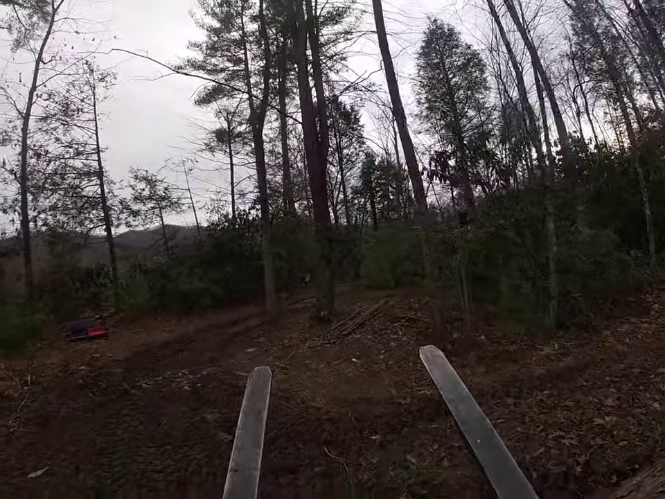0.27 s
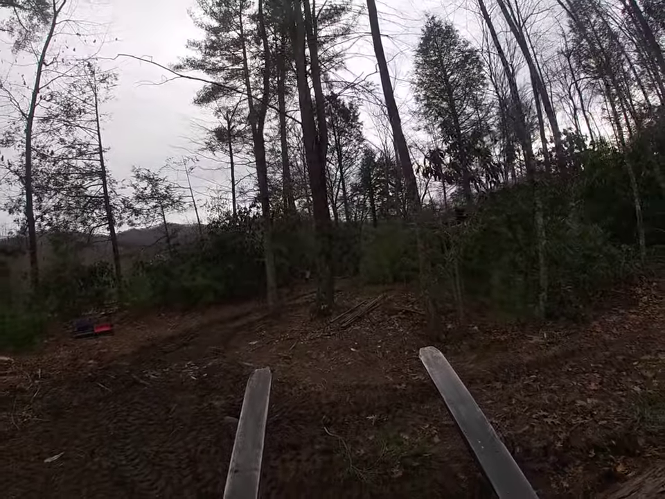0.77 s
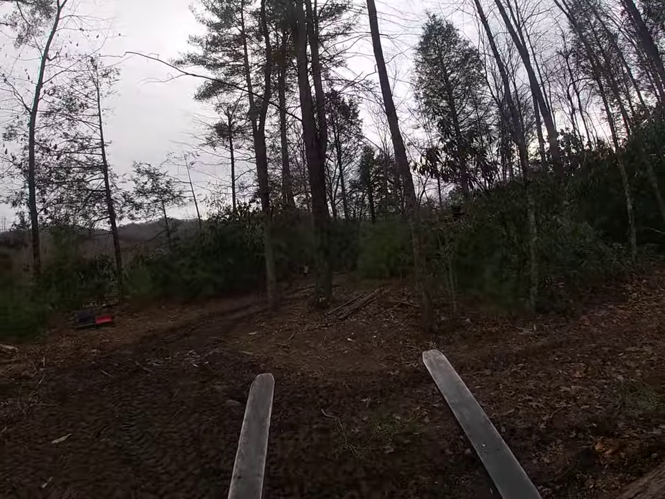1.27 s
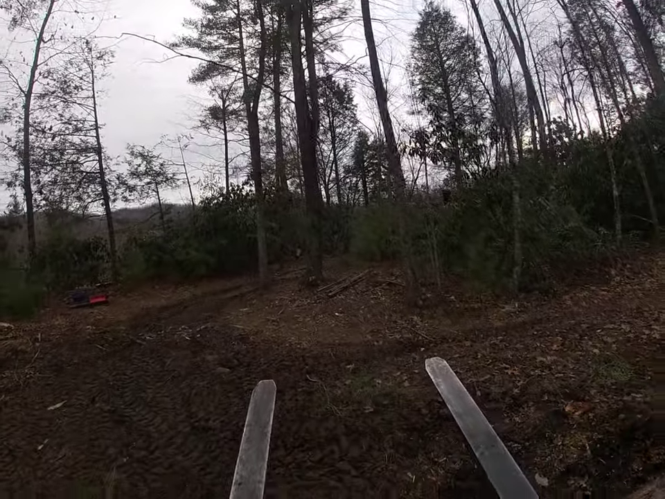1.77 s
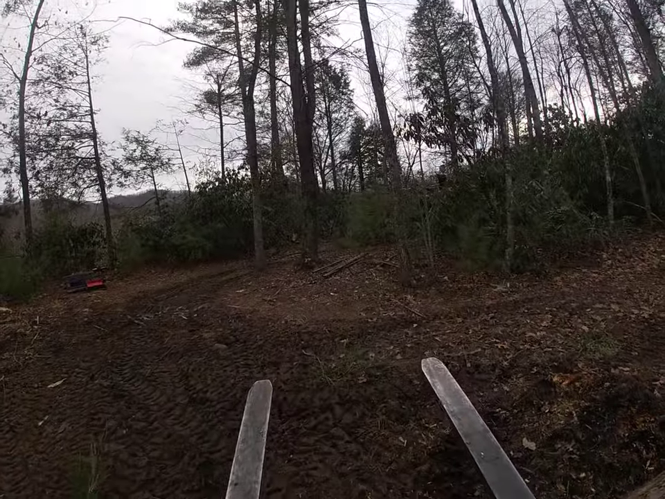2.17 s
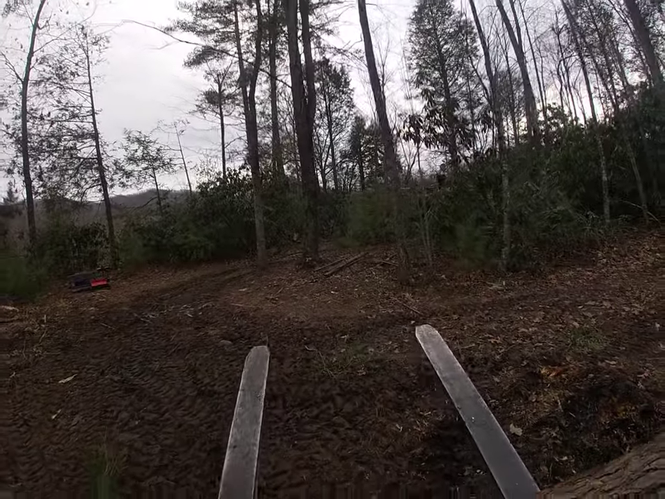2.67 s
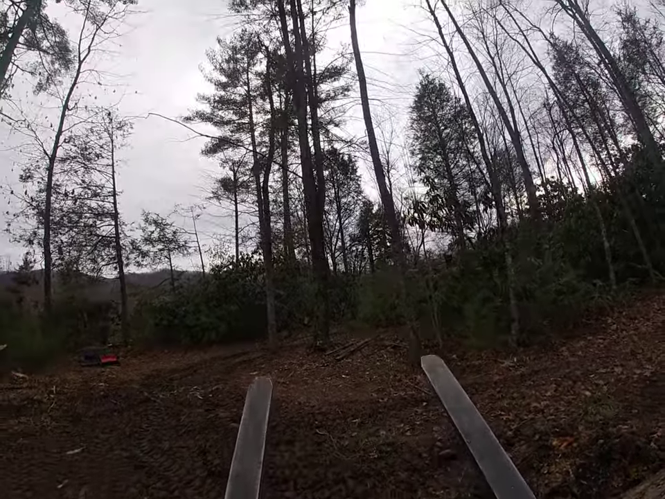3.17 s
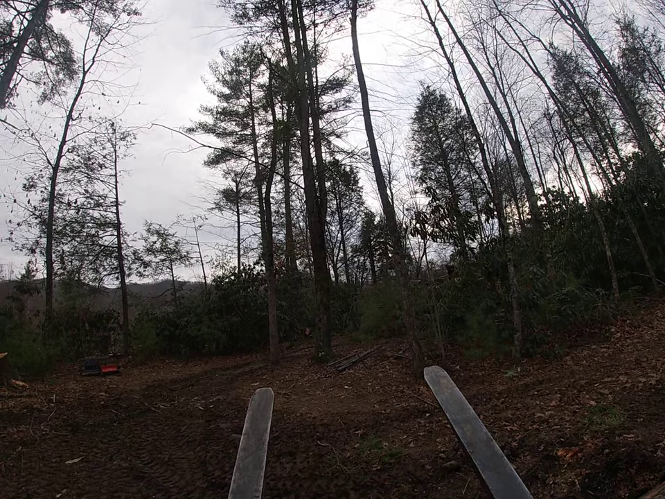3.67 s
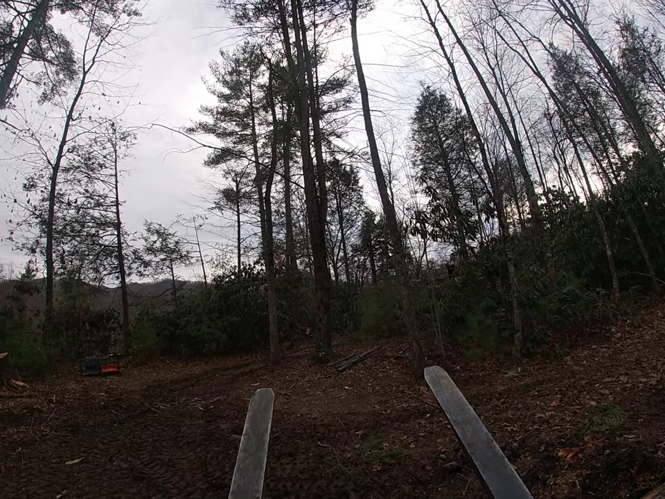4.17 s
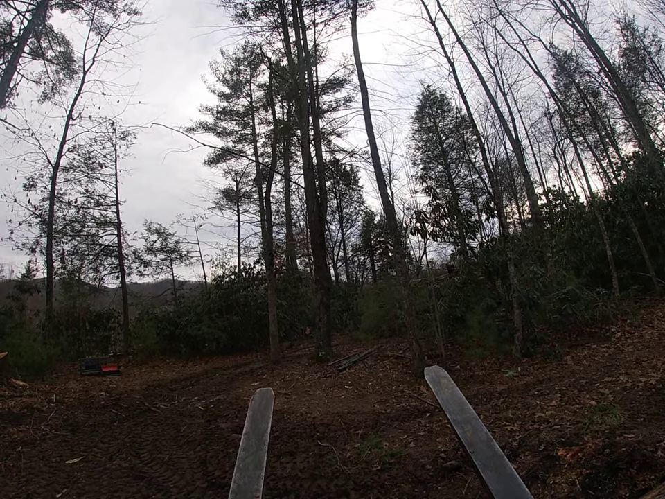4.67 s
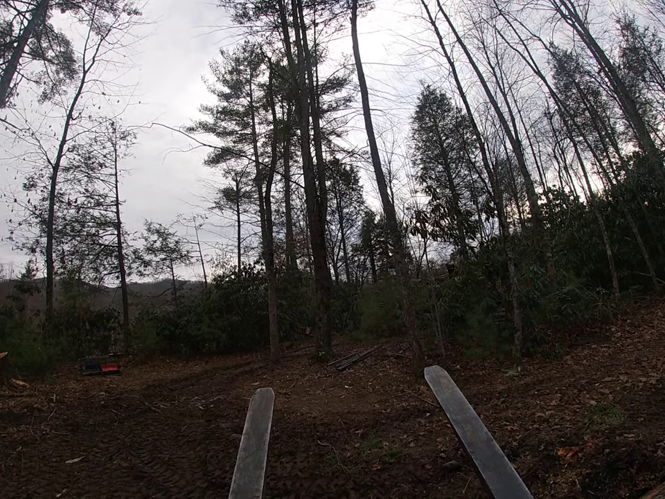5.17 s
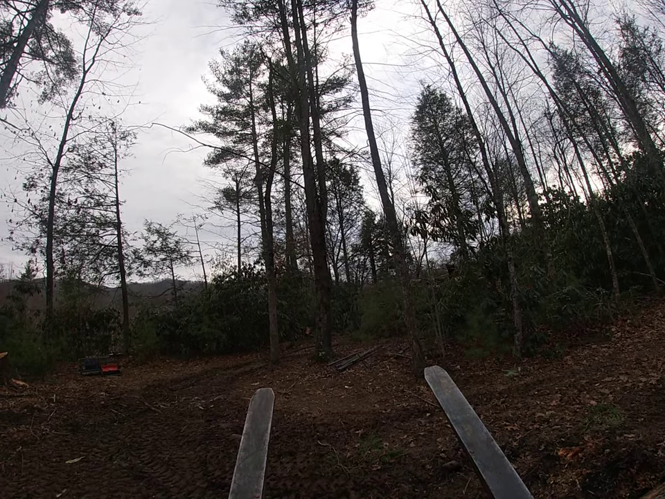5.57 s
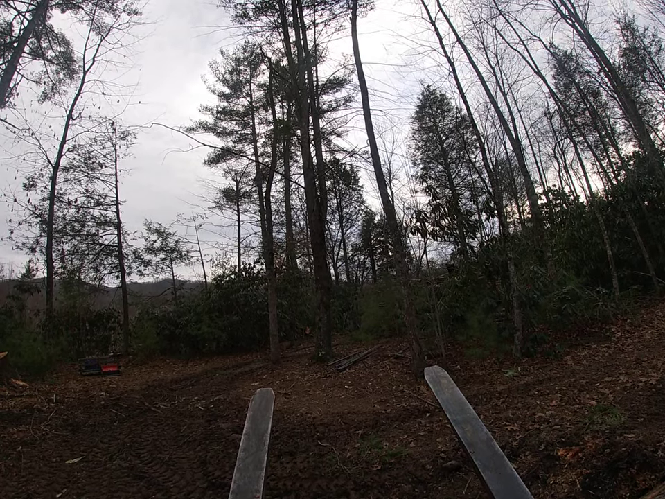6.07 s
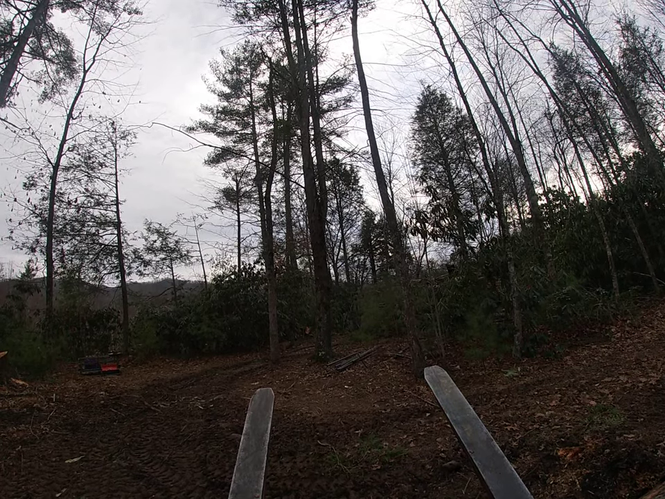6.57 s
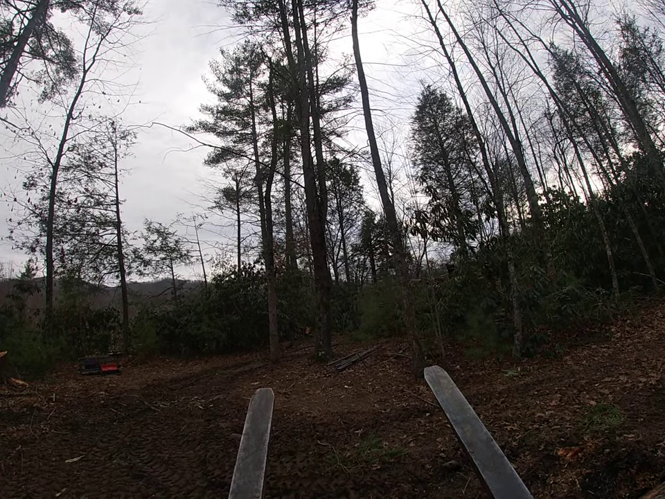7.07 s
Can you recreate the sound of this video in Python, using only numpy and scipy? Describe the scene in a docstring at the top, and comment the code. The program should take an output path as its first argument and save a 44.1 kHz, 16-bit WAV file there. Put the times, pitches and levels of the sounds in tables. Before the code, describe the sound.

A diesel tractor runs close by with its loader hydraulics whining, clunks once, then throttles down to a clattering idle.

```python
"""A three-cylinder diesel tractor, heard from the seat. Its firings pulse the exhaust, shake the
chassis and rattle panels, block and valve gear; fan, pump and gears turn with the crank.
The hydraulics whine while the front loader works. Near 3 s the engine labours, the loader
clunks and its steel clinks. The engine then runs free, is throttled back at 5.5 s, sags and
settles into a clattering idle."""
import sys
import numpy as np
from scipy import signal
from scipy.fft import rfft, irfft, next_fast_len
from scipy.io import wavfile

SR = 44100
rng = np.random.default_rng(int(sys.argv[2]) if len(sys.argv) > 2 else 0)


def unload_audio(sound):
    """Save the sound as a 16-bit wav file, at the path given as the first command line argument."""
    columns = np.transpose(np.atleast_2d(sound))
    # keep every value between -1 and 1, then stretch to whole-number steps
    steps = np.round(np.clip(columns, -1, 1) * 32767)
    wavfile.write(sys.argv[1], SR, steps.astype(np.int16))


N = 323253


def from_db(db):
    """Decibels to gain."""
    return 10 ** (np.asarray(db) / 20)


def unit_rms(x):
    """Scale to rms 1."""
    return x / np.sqrt(np.mean(x ** 2) + 1e-20)


def curve(rows):
    """Interpolate (seconds, value) rows at every sample."""
    return np.interp(np.arange(N) / SR, *np.transpose(rows))


def gesture(start_s, attack_s, hold_s, release_s):
    """Rise from 0 to 1, hold, fall back."""
    corners_s = start_s + np.cumsum([0, attack_s, hold_s, release_s])
    return np.interp(np.arange(N) / SR, corners_s, [0, 1, 1, 0])


def state_db(part_db, state):
    """part_db lists dB running free, then dB added by load, lugging, straining, coasting, idling."""
    return part_db[0] + np.array(part_db[1:]) @ state


def drift(rate_hz):
    """Slow random wander, rms about 1."""
    hop = 100
    pole = np.exp(-2 * np.pi * rate_hz * hop / SR)
    noise = rng.standard_normal(N // hop + 1002)
    slow = signal.lfilter([1], [1, -2 * pole, pole * pole], noise)[1000:]
    return np.interp(np.arange(N) / hop, np.arange(len(slow)), unit_rms(slow))


def tone(turns, flutter_db, wobble_turns):
    """Sine with wavering level and phase, rms 1."""
    gain = from_db(flutter_db * drift(9))
    return unit_rms(gain * np.sin(2 * np.pi * (turns + wobble_turns * drift(7))))


def resonance(hz, centre_hz, width_hz):
    """Gain through a resonance, 1 at its centre."""
    return 1 / np.sqrt(1 + (2 * (hz - centre_hz) / width_hz) ** 2)


def ring(force, hz, t60_s):
    """One mode of a metal part: each tap starts a decaying sine."""
    r, w = from_db(-60 / (t60_s * SR)), 2 * np.pi * hz / SR
    return signal.lfilter([0, np.sin(w)], [1, -2 * r * np.cos(w), r * r], force + 1e-18)


def colour(force, spectrum, modes=()):
    """Pass a force through a body with a broad spectrum and a few resonances; rms 1."""
    size = next_fast_len(N)
    hz = np.arange(size // 2 + 1) * SR / size + 1
    points_hz, points_db = np.transpose(spectrum)
    gain = from_db(np.interp(np.log(hz), np.log(points_hz), points_db))
    gain *= np.minimum(1, hz / points_hz[0]) ** 2 * np.minimum(1, points_hz[-1] / hz) ** 4
    for centre_hz, width_hz, lift_db in modes:
        gain *= 1 + (from_db(lift_db) - 1) * resonance(hz, centre_hz, width_hz) ** 2
    return unit_rms(irfft(rfft(force, size) * gain, size)[:N])


def impacts(firings, repeat, depth, decay, uneven_db, lag):
    """Noisy force swelling once per firing; decay and lag are in firing periods."""
    points = 2800
    cycle = np.interp(firings / 3 % 1 * points, np.arange(points), rng.standard_normal(points))
    # The share `repeat` of the power recurs every three firings.
    force = np.sqrt(repeat) * unit_rms(cycle) + np.sqrt(1 - repeat) * rng.standard_normal(N)
    turns = firings + 1 - lag
    strength = from_db(uneven_db * rng.standard_normal(size=1000))[turns.astype(int)]
    age = turns % 1 / decay
    return force * (1 + depth * strength * age * np.exp(1 - age))


def bursts(rows, spectrum):
    """Short crunches of many tiny contacts, as decaying noise."""
    t, envelope = np.arange(N) / SR, np.zeros(N)
    for start_s, db, decay_s in rows:
        age_s = np.maximum(t - start_s, 0)
        envelope += from_db(db) * (1 - np.exp(-age_s / 0.0022)) * np.exp(-age_s / decay_s)
    return envelope * colour(rng.standard_normal(N), spectrum)


def chatter(modes, taps_per_s):
    """Random taps on loose metal, each striking each mode with its own strength; rms 1."""
    taps = rng.random(N) < taps_per_s / SR
    rings = sum(from_db(db) * ring(taps * rng.uniform(-1.12, 1, N), hz, t60_s)
                for hz, db, t60_s in modes)
    band = signal.butter(2, [1100, 3000], "band", fs=SR, output="sos")
    return unit_rms(signal.sosfilt(band, rings))


# Each row: start in seconds, level in dB, decay in seconds.
TICK_EVENTS = [(.79, -56, .01), (1.362, -48, 0.011), (2.678, -52, 0.0043), (4.443, -52, .014)]
# Each row: frequency in Hz, relative density in dB.
TICK_SPECTRUM = [(3000, -24), (6100, -1), (7500, -7), (10500, -13.5), (14000, -24)]


def ticks():
    """A few faint, bright ticks."""
    return bursts(TICK_EVENTS, TICK_SPECTRUM)


# Each row: frequency in Hz, relative density in dB.
HISS_SPECTRUM = [(5500, -1), (7000, -4), (8000, -7), (9100, -3), (10000, -9.5), (11000, -10.5),
                 (11800, -22), (14500, -20)]


def hiss(firings, idling, valves_db):
    """Injectors and intake hiss, falling back at idle."""
    force = impacts(firings, repeat=.3, depth=.45 + .4 * idling, decay=.15, uneven_db=2, lag=.6)
    return from_db(valves_db - 15 - idling) * colour(force, HISS_SPECTRUM)


# Each row: frequency in Hz, level in dB relative to the valve gear.
RINGING_TONES = [(2607, -9.5), (4070, -20), (6855, -33), (10220, -38)]


def ringing(valves_db):
    """Lightly damped engine parts sing at their own pitches, whatever the speed."""
    t = np.arange(N) / SR
    return sum(from_db(valves_db + db) * tone(hz * t, flutter_db=6, wobble_turns=.21)
               for hz, db in RINGING_TONES)


# Each row: frequency in Hz, relative level in dB, T60 in seconds.
SHEET_MODES = [(1257, -4, .11), (1320, -3.5, .08), (1522, 0, .13), (1542, -2, .1), (2920, -13, .03)]
PIN_MODES = [(1955, -7, .04), (2256, 2, .06), (2280, 0.5, .06), (2360, -7, .06)]
SHEET_DB = (-46, -2.5, -2, 8.5, -7, 10.5)
PIN_DB = (-51, 0.5, 0, -5, -15, 0.5)


def loose_parts(firing_hz, state):
    """A sheet and a pin chatter lightly at speed, harder as the idle rocks the tractor."""
    rocking_db = 13.5 * resonance(firing_hz, centre_hz=23.9, width_hz=2.6)
    sheet = from_db(state_db(SHEET_DB, state)) * chatter(SHEET_MODES, taps_per_s=400)
    pin = from_db(state_db(PIN_DB, state) + rocking_db) * chatter(PIN_MODES, taps_per_s=97)
    return sheet + pin


# Each row: start in seconds, level in dB.
CLINK_EVENTS = [(2.888, -38), (3.110, -27), (3.120, -21), (3.144, -22.5), (3.163, -37), (3.192, -38)]
# Each row: frequency in Hz, relative level in dB, T60 in seconds.
STEEL_MODES = [(3330, -17, 0.081), (3890, -17, 0.06), (4930, -11, .03), (5020, -15, 0.12), (5150, 4, 0.033),
               (8650, -28, 0.061), (8970, -23.5, 0.049), (10500, -41, .06)]


def loader_clinks(contact_s):
    """Loose steel bounces softly; each touch rings every mode with its own strength."""
    out, t = np.zeros(N), np.arange(SR // 2) / SR
    attack = 1 - np.exp(-(t / contact_s) ** 2)
    for start_s, db in CLINK_EVENTS:
        at = int(start_s * SR)
        for hz, mode_db, t60_s in STEEL_MODES:
            strength = from_db(db + mode_db + rng.standard_normal())
            envelope = strength * attack * from_db(-60 * t / t60_s)
            out[at:at + len(t)] += envelope * np.sin(2 * np.pi * (hz * t + rng.random()))
    rubbing = 1 + .45 * drift(120)
    return out * rubbing


# Each row: start in seconds, level in dB, decay in seconds.
CLUNK_EVENTS = [(3.015, -14.5, 0.011), (3.033, -11.5, 0.015), (3.046, -23, 0.051), (3.07, -34, 0.16)]
# Each row: frequency in Hz, relative density in dB.
LOADER_SPECTRUM = [(25, 3), (120, 10.5), (250, 10), (600, 1.5), (1200, -5), (2200, -9), (3500, -15.5),
                   (5500, -19.5), (7000, -31.5), (10000, -54), (13000, -60)]


def loader_clunks():
    """The loader takes a quick run of dull knocks."""
    return bursts(CLUNK_EVENTS, LOADER_SPECTRUM)


# Each row: frequency in Hz, relative density in dB.
OIL_SPECTRUM = [(90, -22), (175, -5), (280, 9.5), (400, 14.5), (520, -34.5), (700, -28), (850, -1.5),
                (1050, -5.5), (1300, -14), (2000, -10.5), (3000, -13.5), (4500, -55), (8000, -44)]
# Each row: multiple of the firing rate, level in dB at full load.
GEAR_OVERTONES = [(24.89, -47), (31.1, -52), (37.33, -52), (90.66, -59)]


def hydraulics(firings, load, lugging):
    """Under load high gear tones sing and oil rushes through the valves, less as the engine lugs."""
    rush = from_db(-29 - 8 * lugging) * colour(rng.standard_normal(N), OIL_SPECTRUM)
    singing = sum(from_db(db) * tone(multiple * firings, flutter_db=2, wobble_turns=.08)
                  for multiple, db in GEAR_OVERTONES)
    return np.sqrt(load) * rush + load ** 2 * singing


PUMP_DB = (-39, 14.5, 2.5, 1.5, 5, 4)
PUMP_OCTAVE_DB = (-35, -0.5, 1.5, 8.5, 3, -5)


def pump_whine(firings, firing_hz, state, per_firing):
    """The hydraulic pump's tone and octave swell as they cross body resonances."""
    hz, turns = per_firing * firing_hz, per_firing * firings
    groan_db = 13 * gesture(2.52, .14, .04, .11)  # just before the load gives
    base = from_db(state_db(PUMP_DB, state) + groan_db) * tone(turns, flutter_db=1.8, wobble_turns=.05)
    octave = from_db(state_db(PUMP_OCTAVE_DB, state)) * tone(2 * turns, flutter_db=1.3, wobble_turns=.06)
    return base * resonance(hz, 279.5, width_hz=8) + octave * resonance(2 * hz, 582, width_hz=12)


DRIVE_GEAR_DB = (-57, 6, 5, 18, -8, -8)
PUMP_GEAR_DB = (-54.5, 21, .5, -3.5, -9, -8)


def gear_whine(firings, state):
    """Tooth tones of the drive and pump gears, smeared by uneven meshing."""
    drive = tone(18.68 * firings, flutter_db=1, wobble_turns=.09) * (1 + .4 * drift(30))
    pump = tone(22.665 * firings, flutter_db=1.2, wobble_turns=.05) * (1 + .2 * drift(30))
    return from_db(state_db(DRIVE_GEAR_DB, state)) * drive + from_db(state_db(PUMP_GEAR_DB, state)) * pump


FAN_DB = (-24, -1, -1.5, 2, -8.5, -23)


def fan(firings, state, boom_db, per_firing):
    """The belted cooling fan's blades hum; the octave stands out under load."""
    load, turns = state[0], per_firing * firings
    hum = from_db(state_db(FAN_DB, state) + boom_db) * tone(turns, flutter_db=.8, wobble_turns=.015)
    octave = from_db(-32) * tone(2 * turns, flutter_db=1, wobble_turns=.025)
    return hum + np.sqrt(load) * octave


def shudder(firings, firing_hz, coasting):
    """With fuel cut, each compression stroke thumps the floor pan, weaker as the crank slows."""
    strokes = np.diff(np.floor(firings + .3), prepend=0)
    pan = ring(strokes, hz=285, t60_s=.04) + from_db(-4) * ring(strokes, hz=240, t60_s=.035)
    return from_db(-26) * coasting * (firing_hz / GOVERNED_HZ) ** 2 * unit_rms(pan)


# Each row: frequency in Hz, relative density in dB.
KNOCK_SPECTRUM = [(100, -1), (125, 1), (165, -9), (200, -1), (248, 16.5), (310, 10.5), (400, 6),
                  (650, -1.5), (1000, 0), (1900, -4.5), (2550, -16), (3000, -6), (3600, -9), (4300, -14),
                  (5300, -12.5), (6500, -28.5)]


def idle_knock(firings, coasting, idling):
    """At idle each small charge of fuel burns with a separate hard knock."""
    force = impacts(firings, repeat=.5, depth=1.2, decay=.14, uneven_db=1.5, lag=.4)
    return idling * from_db(-32.5 - 12.5 * coasting) * colour(force, KNOCK_SPECTRUM)


# Each row: frequency in Hz, relative density in dB.
PANEL_SPECTRUM = [(20, -32.5), (35, -3), (70, -10), (170, -9.5), (250, -3.5), (310, -7.5), (360, -21),
                  (470, -9), (600, -14), (800, -22), (1300, -31)]
BLOCK_SPECTRUM = [(300, -27.5), (600, 0.5), (850, 2), (1100, -4), (1400, -2), (1800, -1.5), (2600, -12),
                  (3500, -13.5), (5000, -31.5)]
VALVE_SPECTRUM = [(1500, -6.5), (2800, 5), (4000, -2.5), (4700, 0), (5400, 0), (6100, -7), (6800, -20.5),
                  (7600, -32.5)]
# Each row: centre in Hz, width in Hz, lift in dB.
PANEL_MODES = [(250, 78, 5.1), (284, 9.7, 7.6), (440, 99, 2.1), (554, 31, 4)]
BLOCK_MODES = [(864, 76, 4.7), (1043, 190, 3.4), (1070, 31, 2.2), (1333, 103, 7.8), (1518, 12, 12.4),
               (2390, 10, 1.4)]
VALVE_MODES = [(2870, 28, 2.2), (4220, 90, 5)]
PANELS_DB = (-23.3, -1.8, -.5, 1.5, -2.5, -13.5)
BLOCK_DB = (-34.5, 0.5, 3, 0, -4.5, -4.5)


def clatter(firings, state, boom_db, racing_db, valves_db):
    """Combustion rattles the panels, knocks in the block and ticks in the valve gear."""
    idling = state[-1]
    rattle = impacts(firings, repeat=.16, depth=.4 + 1.2 * idling, decay=.17, uneven_db=1, lag=.7)
    knock = impacts(firings, repeat=.45, depth=.4 + .4 * idling, decay=.08, uneven_db=2, lag=0)
    tick = impacts(firings, repeat=.45, depth=.45 + .4 * idling, decay=.15, uneven_db=1.8, lag=.3)
    panels = from_db(state_db(PANELS_DB, state) + boom_db) * colour(rattle, PANEL_SPECTRUM, PANEL_MODES)
    block = from_db(state_db(BLOCK_DB, state) + racing_db) * colour(knock, BLOCK_SPECTRUM, BLOCK_MODES)
    valves = from_db(valves_db) * colour(tick, VALVE_SPECTRUM, VALVE_MODES)
    return panels + block + valves


# Each row: multiple of the four-stroke cycle rate, then level in dB working, running free, idling.
CHASSIS_ORDERS = [(4.02, -42, -47.5, -66), (7, -46.5, -54, -36), (8, -50, -47, -61), (10, -38, -39.5, -62),
                  (11.07, -47, -47.5, -65), (11.99, -30, -46.5, -36), (13.11, -35, -37.5, -49),
                  (14.96, -45, -31.5, -30.5), (15.96, -36, -46, -55), (17.18, -34, -40, -36),
                  (17.85, -35.5, -30, -44), (19.4, -48.5, -43.5, -49), (21.34, -40, -44.5, -40),
                  (24.26, -43, -43.5, -38), (26.97, -47, -50.5, -34.5), (28.6, -43.5, -47, -61),
                  (30.3, -60, -39, -31), (32.24, -46, -50.5, -37.5), (36.57, -48.5, -45.5, -38.5),
                  (61.2, -49, -47, -44), (63, -60.5, -47.5, -54)]


def chassis_drone(firings, load, coasting, idling):
    """Unequal cylinders shake the chassis; load and speed shift the balance of its tones."""
    out, cycles = np.zeros(N), (firings - .2) / 3
    for order, working_db, free_db, idle_db in CHASSIS_ORDERS:
        running_db = load * working_db + (1 - load) * free_db
        db = (1 - idling) * running_db + idling * idle_db
        phase = rng.random() * (order % 3 > 0)  # random start for all but the highest tone
        out += from_db(db) * tone(order * cycles + phase, flutter_db=1.2, wobble_turns=.02)
    return from_db(-13.5 * coasting) * out


EXHAUST_1_DB = (-15, 1.2, -7.5, -1, 2, -2)
EXHAUST_2_DB = (-26, 0.4, 2.5, 0, 3.5, -12.5)
EXHAUST_3_DB = (-27.5, 0, 1, -2.5, -1, -5.5)


def exhaust(firings, firing_hz, state, boom_db, bass_edge_hz):
    """Three lowest harmonics of the exhaust pulses; the second drops out when fuel is cut at speed."""
    *_, coasting, idling = state
    unfired = coasting * np.clip(1 - 1.5 * idling, 0, 1)
    first = from_db(state_db(EXHAUST_1_DB, state)) / np.sqrt(1 + (bass_edge_hz / firing_hz) ** 8)
    second = from_db(state_db(EXHAUST_2_DB, state) - 33 * unfired)
    third = from_db(state_db(EXHAUST_3_DB, state) + boom_db)
    return -sum(gain * tone(k * firings, flutter_db=.3 + .15 * k, wobble_turns=.005 * k)
                for k, gain in enumerate((first, second, third), 1))


# Each row: time in seconds, firing rate in Hz.
FIRING_RATE = [(0.0, 45.81), (0.58, 45.65), (0.97, 44.42), (1.35, 44.27), (2.25, 44.88), (2.6, 45.95),
               (2.8, 44.35), (3.0, 43.18), (3.2, 43.34), (3.52, 46.63), (4.5, 46.51), (5.53, 46.54),
               (5.8, 38.21), (6.0, 32.34), (6.25, 25.69), (6.4, 24.01), (6.85, 25.17), (7.33, 25.64)]
GOVERNED_HZ, DROOP_HZ, SHAKY_HZ, IDLE_HZ = 46.55, 3.4, 42, 26


def engine_state(fuel_cut_s):
    """Firing rate and five shares of 0-1: load, lugging, straining, coasting, idling."""
    firing_hz = curve(FIRING_RATE)
    throttle_open = np.arange(N) / SR < fuel_cut_s
    load = gesture(-0.76, 1.42, 1.91, 1.02)  # the loader works
    lugging = np.clip((GOVERNED_HZ - firing_hz) / DROOP_HZ, 0, 1) * throttle_open
    straining = gesture(2.39, .095, .21, .37)  # the loader meets extra resistance
    coasting = gesture(fuel_cut_s, .17, .36, .99)
    idling = np.clip((SHAKY_HZ - firing_hz) / (SHAKY_HZ - IDLE_HZ), 0, 1)
    return firing_hz, np.array([load, lugging, straining, coasting, idling])


# Boom of the body. Each row: time in seconds, gain in dB.
BODY_BOOM = [(0, -3.5), (.3, -2.8), (1.3, -0.5), (3.0, 0), (3.25, -3), (3.75, 2), (4.3, -0.5), (5.5, -0.5)]
VALVES_DB = (-45.5, 0.5, -0.5, 0, -4, -4)


def scene():
    """Engine, driven parts and loader, close by in the open air; mono."""
    firing_hz, state = engine_state(fuel_cut_s=5.53)
    load, lugging, _, coasting, idling = state
    firings = np.cumsum(firing_hz) / SR
    boom_db, valves_db = curve(BODY_BOOM), state_db(VALVES_DB, state)
    racing_db = 3.5 * gesture(3.23, .21, .29, .43)  # freed of its load, the engine rattles harder
    mix = ticks() + hiss(firings, idling, valves_db) + ringing(valves_db)
    mix += from_db(racing_db) * loose_parts(firing_hz, state)
    mix += loader_clinks(contact_s=.0014) + loader_clunks() + hydraulics(firings, load, lugging)
    mix += pump_whine(firings, firing_hz, state, per_firing=6.295) + gear_whine(firings, state)
    mix += fan(firings, state, boom_db, per_firing=4.577)
    mix += shudder(firings, firing_hz, coasting) + idle_knock(firings, coasting, idling)
    mix += clatter(firings, state, boom_db, racing_db, valves_db)
    mix += from_db(boom_db) * chassis_drone(firings, load, coasting, idling)
    mix += exhaust(firings, firing_hz, state, boom_db, bass_edge_hz=39.8)
    return mix[None]


def record(dry):
    """Steep low-pass, 70 dB down at 14.9 kHz."""
    return signal.sosfilt(signal.cheby2(12, 70, 14900, fs=SR, output="sos"), dry)


dry = scene()
out = record(dry)
unload_audio(out)
```